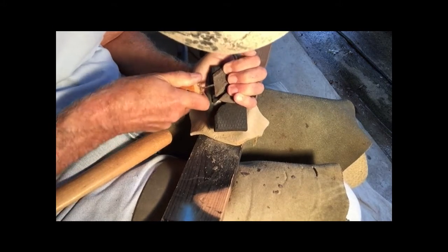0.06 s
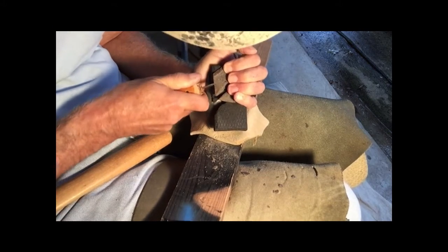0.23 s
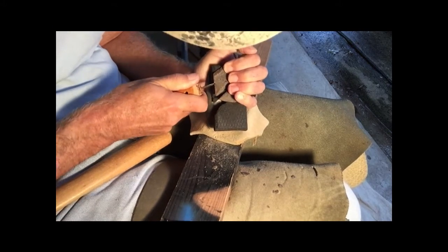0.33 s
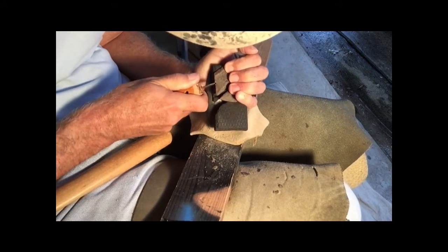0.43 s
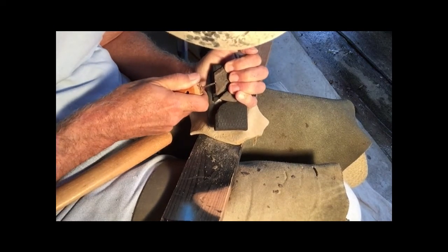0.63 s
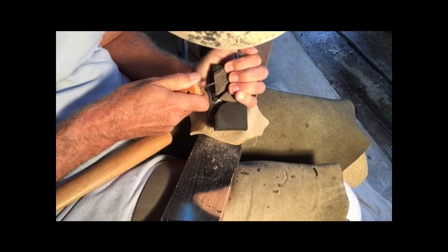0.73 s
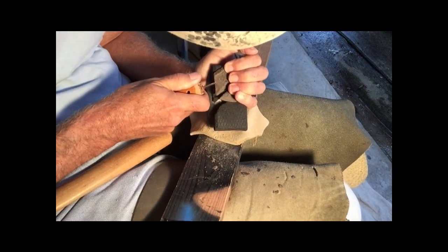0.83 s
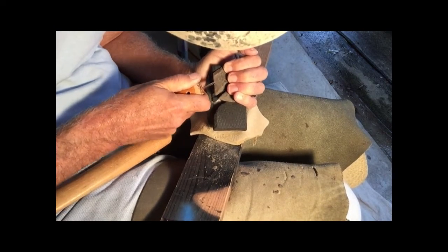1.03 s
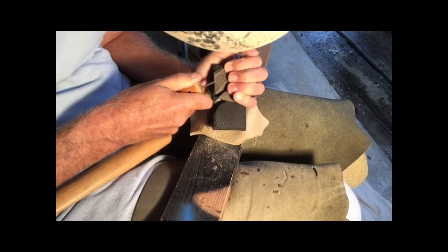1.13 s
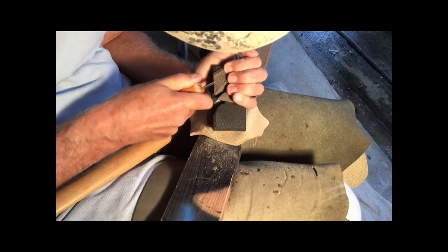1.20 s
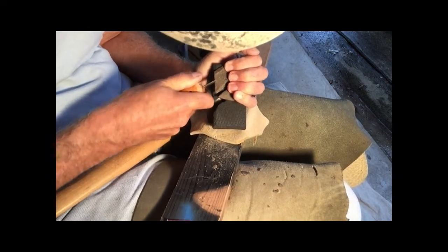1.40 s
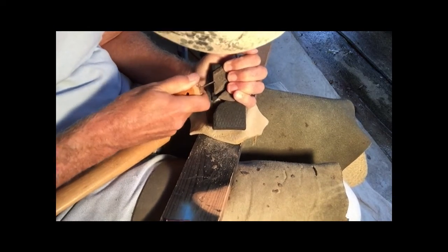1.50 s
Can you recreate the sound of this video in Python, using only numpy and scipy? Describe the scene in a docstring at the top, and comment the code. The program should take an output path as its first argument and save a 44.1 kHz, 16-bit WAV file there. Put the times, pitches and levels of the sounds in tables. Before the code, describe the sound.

Sharp brittle clicks of a pointed tool pressing flakes off a small stone, in a quiet room

```python
"""A metal-tipped tool presses small flakes off a hand-held stone point in a quiet room.
A low wavering hum and air noise last throughout; grit, of filtered grains, ticks and rustles before, between
and after the cracks. Near 0.05, 0.21, 1.22 and 1.30 s flakes snap free in cracks that excite the stone's damped modes
for some milliseconds; with them the freed tip knocks and thumps on the pad below, and the room answers with echoes
and a short noise tail. From 0.8 s to 0.98 s a faint whistle, a sine of unsteady pitch, swells, slides down and fades."""
import sys
import numpy as np
from scipy import signal
from scipy.fft import rfft, irfft
from scipy.io import wavfile
from scipy.ndimage import uniform_filter1d

SR = 44100
rng = np.random.default_rng(int(sys.argv[2]) if len(sys.argv) > 2 else 0)


def generate_wav(sig):
    """Save sig (samples, or channels by samples) to the path in sys.argv[1] as 16-bit PCM at SR."""
    pcm = np.round(np.clip(np.atleast_2d(sig).T, -1, 1) * 32767).astype(np.int16)
    wavfile.write(sys.argv[1], SR, pcm)


N = 68355

# Spectrum of the steady air noise, before scaling to its level: freq_hz, density_db
AIR_SPECTRUM = [(15, -30), (25, -61), (44, -20.5), (102, -6), (145, -12), (166, -9), (242, -12.5),
                (531, -18), (624, -16.5), (2990, -21.5), (3340, -21.5), (14400, -37.5), (16000, -40.5)]
AIR_LEVEL_DB = -65.5
# Hum resonances, before the swell: freq_hz, bandwidth_hz, level_db
HUM_MODES = [(60, 10, -86), (108, 14, -88.5), (178, 20, -83), (244.9, 7, -72.5), (456, 8.2, -87.5)]
# Swell of the hum: time_s, gain_db
HUM_SWELL = [(0, -2), (.3, -4), (.55, 5.5), (.72, -3.), (.84, 1.5), (0.999, -5.5), (1.15, 4), (1.45, 7.5),
             (1.55, 2.2)]

# Grit ticks and rustles; the fade is a Gaussian spread: peak_s, rise_s, fade_s, level_db, centre_hz, width_octaves
GRIT_BURSTS = [(0.0166, 0.0013, 0.0035, -52.5, 5535, 2.1), (0.022, 0.0013, 0.001, -46, 5500, 0.44),
               (0.0358, 0.002, .001, -58, 10900, 0.62), (0.043, 0.022, 0.024, -57.5, 2780, 2.4),
               (0.078, 0.045, .015, -62.5, 915, 2.7), (0.0885, 0.0013, 0.0025, -61, 10860, 0.61),
               (.102, 0.00077, 0.00096, -53.5, 7000, 2), (.15, 0.02, .015, -62.5, 600, 1.8),
               (0.1623, 0.00088, 0.0016, -56, 6040, .4), (.168, .004, 0.0098, -61, 6720, .6),
               (0.174, .001, .002, -56, 6390, 0.36), (0.196, 0.015, 0.026, -57.5, 2780, 2.65),
               (.195, .001, 0.0017, -54, 10500, .7), (.342, .001, 0.0014, -61.5, 11000, .5),
               (.345, 0.023, 0.016, -68, 10400, .8), (0.634, 0.0058, 0.02, -61.5, 9300, 1.9),
               (.675, .03, 0.025, -71, 6100, 1.13), (0.664, .015, 0.046, -61.5, 3640, 0.84),
               (0.99, 0.0078, 0.0059, -63, 9000, 1.8), (1.06, .002, 0.006, -71.5, 3980, 2.2),
               (1.216, .001, 0.0056, -60.5, 10000, 1.9), (1.261, .005, 0.041, -60, 1700, 2.44),
               (1.276, 0.005, 0.03, -67, 4340, 0.86), (1.355, .002, 0.0032, -65.5, 11000, .9),
               (1.445, .001, 0.0018, -64, 8000, 1.1)]
GRAINS_PER_S, GRAIN_SPREAD_DB = 18000, 3

# Modes of the held stone and tool tip, t60 of each of two cascaded resonances: freq_hz, t60_s
STONE_MODES = [(2300, .005), (3400, .0033), (3850, .003), (4550, .0035), (5300, .003), (6000, .003),
               (6600, .0033), (7900, .003), (9300, .003), (10800, .003), (12000, .003), (13700, .0028)]
# Cracks; spray and modes are relative to the level: start_s, level_db, spray_db, then mode_db for each stone mode
CRACKS = [(0.0476, -33, -14.5, -10, 3.5, -19.5, 2.5, -35, -1.5, -39, -29, -12, -24.5, -8.5, -13),
          (0.2117, -9.5, -30, -35.5, -4.5, 0.5, -15, -32, -10, -10.5, -12, -17, -4.5, -15, -8),
          (0.2127, -11, -6.5, -7.5, -34, 1, 6.5, 1.5, 1.5, -10, -40, -27, -26, -16.5, -24.5),
          (0.2144, -17, -30, -6.5, -14.5, -16.5, -1, -22, -6.5, -7.5, -6, -9.5, -35.5, -33, -29.5),
          (1.2248, -31, -4, -32, -2.5, -23, -3, -23.5, -0.5, -1.5, -9, -20, -15.5, -36, -24),
          (1.2979, -15.5, -13, -9.5, -6.5, 1.5, -21, -26, 1, -30, -9.5, -19, -21.5, -15.5, -19)]
SPRAY_GAIN = 10

# Tip on pad; thud and thump are relative to the level: start_s, level_db, pitch_hz, thud_db, thump_db
KNOCKS = [(.0478, -37, 1745, -29.5, -23), (.2128, -13, 1555, -18, -32.5), (1.2243, -34.5, 1730, -36.5, -43),
          (1.256, -50.5, 1620, -3, -30), (1.2990, -25, 1530, -13.5, -36)]
KNOCK_T60_S, THUD_HZ, THUD_T60_S = 0.0061, 758, 0.0039  # t60 of each of two cascaded resonances
THUMP_HZ, THUMP_T60_S = 98.7, 0.0535  # the jolt through the lap

# Below these corners the small stone, the tip, and both together send out little
STONE_CUT_HZ, KNOCK_CUT_HZ, LOW_CUT_HZ = 2550, 1200, 250

# Early echoes: delay_s, level_db, centre_hz
ECHOES = [(0.0089, -22.5, 3525), (.0165, -36, 5034)]
# Bands of the room tail: freq_hz, level_db, t60_s
TAIL_BANDS = [(300, -32, .3), (700, -38.5, .3), (1500, -51.5, 0.53), (2000, -44, 0.58), (2600, -40.5, .31),
              (3430, -48.5, 0.4), (4130, -53.5, 0.59), (4577, -51.5, 0.66), (5300, -44, 0.52),
              (6100, -50, .33), (6500, -39, .38), (7390, -43, .33), (9180, -44, .3), (10500, -48.5, 0.22),
              (12500, -47, .24), (14500, -49, .22)]
TAIL_END_S = .175  # beyond this the tail drops away faster

# Whistle, level before its envelope: start_s, peak_s, end_s, level_db, first_hz, last_hz, waver_rms_hz
WHISTLE = (.8, .92, .98, -73, 3040, 2900, 40)

SOFT_TOP_HZ, CUTOFF_HZ = 15400, 16300  # quiet sound is 30 dB down from the first, all sound 70 dB from the second
OVERLOAD_CEILING = .54


def from_db(db):
    """Logarithmic level: 20 dB is a tenfold amplitude."""
    return 10 ** (np.asarray(db) / 20)


def rms_one(x):
    """Normalization by mean power: the result has rms 1."""
    return x / np.sqrt(np.mean(x ** 2) + 1e-20)


def ring(clicks, hz, t60):
    """Damped resonance: a unit click sets an exponentially decaying sine of height 1 ringing."""
    radius = from_db(-60 / (t60 * SR))
    angle = 2 * np.pi * hz / SR
    return signal.lfilter([0, np.sin(angle)], [1, -2 * radius * np.cos(angle), radius * radius], clicks + 1e-18)


def burst(clicks, hz, t60):
    """Cascaded resonance: one damped mode drives its twin, so the sound swells and dies, height 1."""
    gain = 2 * np.e * np.log(1000) / (t60 * SR)
    return gain * ring(ring(clicks, hz, t60), hz, t60)


def push(start, width):
    """Impulse of finite contact time: a sine-squared force of unit area."""
    phase = np.clip((np.arange(N) / SR - start) / width, 0, 1)
    return np.sin(np.pi * phase) ** 2 * 2 / (width * SR)


def band(x, low_hz, high_hz):
    """Band limitation: only frequencies between two corners pass."""
    corners = [low_hz, min(high_hz, .45 * SR)]
    return signal.sosfilt(signal.butter(2, corners, "band", fs=SR, output="sos"), x)


def high(x, hz, order=3):
    """High-pass radiation: small objects send out little bass."""
    return signal.sosfilt(signal.butter(order, hz, "high", fs=SR, output="sos"), x)


def narrow(hz, width):
    """Noise-driven resonance: bandwidth sets the decay time; the start is discarded and rms is 1."""
    t60 = np.log(1000) / np.pi / width
    return rms_one(ring(rng.standard_normal(N + SR // 2), hz, t60)[-N:])


def floor():
    """Stationary noise: a shaped random spectrum, plus narrow resonances whose level wavers as hum."""
    table_hz, density_db = np.transpose(AIR_SPECTRUM)
    f = np.maximum(np.arange(N // 2 + 1) * SR / N, 1)
    weights = from_db(np.interp(np.log(f), np.log(table_hz), density_db))
    air = rms_one(irfft(rfft(rng.standard_normal(N)) * weights, N))
    hum = sum(from_db(db) * narrow(hz, width) for hz, width, db in HUM_MODES)
    swell = from_db(np.interp(np.arange(N) / SR, *np.transpose(HUM_SWELL)))
    return from_db(AIR_LEVEL_DB) * air + swell * hum


def grit():
    """Granular noise: dense uneven random grains, band-limited, swell and fade in bursts."""
    t, out = np.arange(N) / SR, 0
    present = rng.random(N) < GRAINS_PER_S / SR
    heights = from_db(GRAIN_SPREAD_DB * rng.exponential(1, N))
    grains = present * heights * rng.choice([-1, 1], N)
    for peak, rise, fade, db, hz, octaves in GRIT_BURSTS:
        swell = np.clip(1 + (t - peak) / rise, 0, 1)
        decay = np.exp(-np.clip(t - peak, 0, None) ** 2 / fade ** 2 / 2)
        colour = rms_one(band(grains, hz * 2 ** (-octaves / 2), hz * 2 ** (octaves / 2)))
        out = out + from_db(db) * swell * decay * colour
    return out


def cracks():
    """Modal excitation: each crack strikes every stone mode; also gives the broad spray only the room returns."""
    rows = np.array(CRACKS)
    pushes = np.array([push(start, 3 / SR) for start in rows[:, 0]])
    level_db, spray_db = rows[:, 1], rows[:, 2]
    rings = 0
    for k, (hz, t60) in enumerate(STONE_MODES):
        rings = rings + burst(from_db(level_db + rows[:, 3 + k]) @ pushes, hz, t60)
    spray = signal.lfilter([1, -.6], [1], from_db(level_db + spray_db) @ pushes)  # tilted to the treble
    return high(rings, STONE_CUT_HZ), SPRAY_GAIN * spray


def knocks():
    """Impact on a damped body: a short knock with a lower thud; also gives the deep thump."""
    knock, thump_pushes = 0, 0
    for start, db, hz, thud_db, thump_db in KNOCKS:
        hit = push(start, 4 / SR)
        tip = high(burst(hit, hz, KNOCK_T60_S), KNOCK_CUT_HZ)
        thud = from_db(thud_db) * burst(hit, THUD_HZ, THUD_T60_S)
        knock = knock + from_db(db) * (tip + thud)
        thump_pushes = thump_pushes + from_db(db + thump_db) * hit
    return knock, ring(thump_pushes, THUMP_HZ, THUMP_T60_S)


def room(near, spray):
    """Reverberation: a few coloured echoes and convolution with a noise tail that dies band by band."""
    t = np.arange(SR // 2) / SR
    hz = np.array(TAIL_BANDS)[:, 0]
    edges = np.r_[hz[0] / 2, np.sqrt(hz[1:] * hz[:-1]), hz[-1] * 1.1]
    white = rng.standard_normal((2, len(t)))  # neighbouring bands use different noise
    tail = 0
    for k, (_, db, t60) in enumerate(TAIL_BANDS):
        sos = signal.butter(2, edges[k:k + 2], "band", fs=SR, output="sos")
        tail = tail + from_db(db - 60 * t / t60) * signal.sosfiltfilt(sos, white[k % 2])
    onset = np.clip(t / 0.0013 - .5, 0, 1)
    tail = tail * onset / (1 + (t / TAIL_END_S) ** 8)
    echoes = 0
    for delay, db, centre in ECHOES:
        delayed = np.roll(near, int(delay * SR))
        echoes = echoes + from_db(db) * band(delayed, centre / 1.58, centre * 1.36)
    return signal.fftconvolve(near + spray, tail)[:N] + echoes


def whistle():
    """Frequency modulation: the phase of a thin tone sums a sliding, randomly wavering frequency."""
    start, peak, end, db, first_hz, last_hz, waver_hz = WHISTLE
    t = np.arange(N) / SR
    waver = rms_one(uniform_filter1d(rng.standard_normal(N), size=300))
    hz = np.interp(t, [start, end], [first_hz, last_hz]) + waver_hz * waver
    # the end values hold, so a much fainter tone lies before and after
    envelope = np.interp(t, [start, start + 0.023, peak, end], [0.062, 0.35, 1.9, 0.011])
    return from_db(db) * envelope * np.sin(2 * np.pi * np.cumsum(hz) / SR)


def scene():
    """Superposition: direct sound, thump and the treble-limited quiet sounds add."""
    rings, spray = cracks()
    knock, thump = knocks()
    near = high(rings + knock, LOW_CUT_HZ, order=2)
    quiet = floor() + grit() + room(near, spray) + whistle()
    quiet = signal.sosfilt(signal.cheby2(10, 30, SOFT_TOP_HZ, fs=SR, output="sos"), quiet)
    return (near + thump + quiet)[None]


def record(dry):
    """Saturation and band limitation: peaks are rounded, then the top is cut."""
    rounded = OVERLOAD_CEILING * np.tanh(dry / OVERLOAD_CEILING)
    return signal.sosfilt(signal.cheby2(14, 70, CUTOFF_HZ, fs=SR, output="sos"), rounded)


dry = scene()
out = record(dry)
generate_wav(out)
```